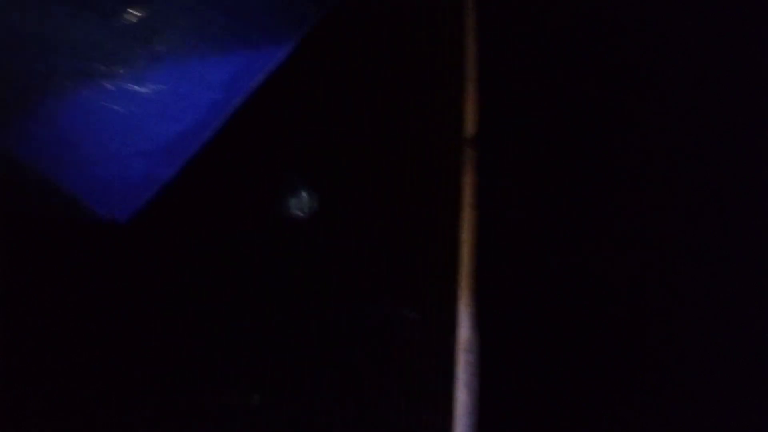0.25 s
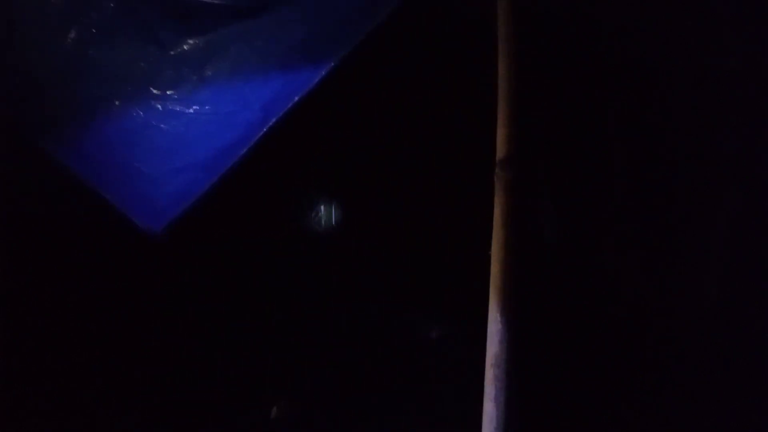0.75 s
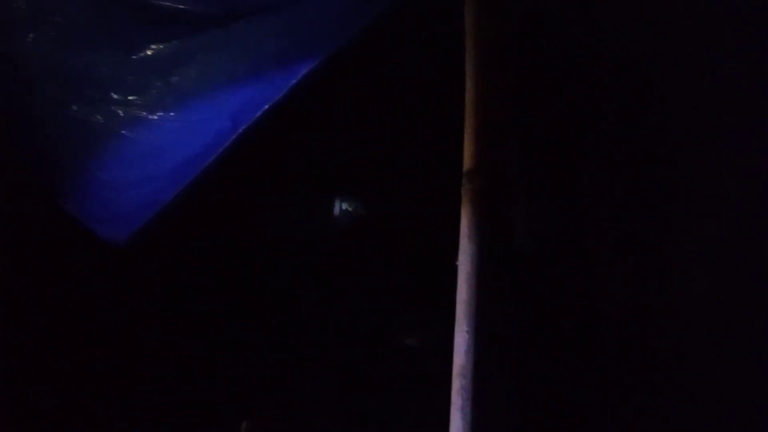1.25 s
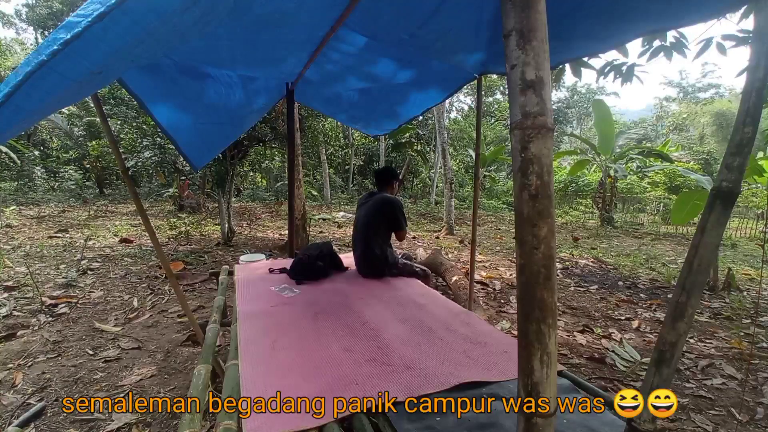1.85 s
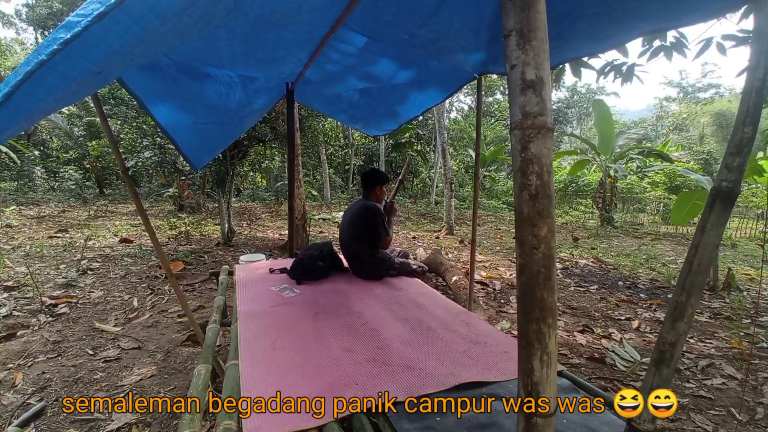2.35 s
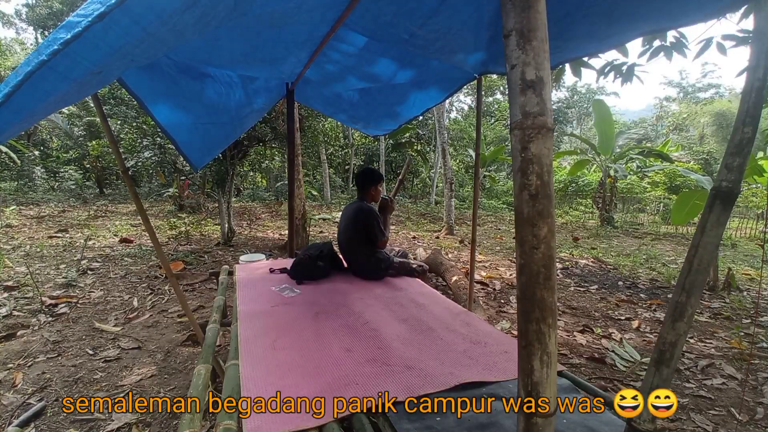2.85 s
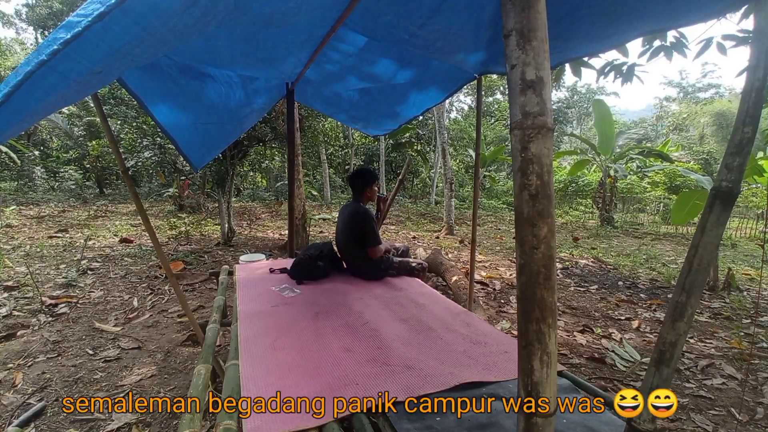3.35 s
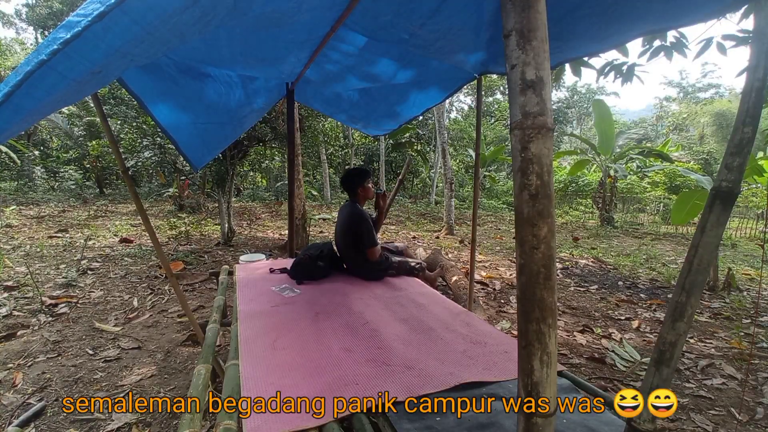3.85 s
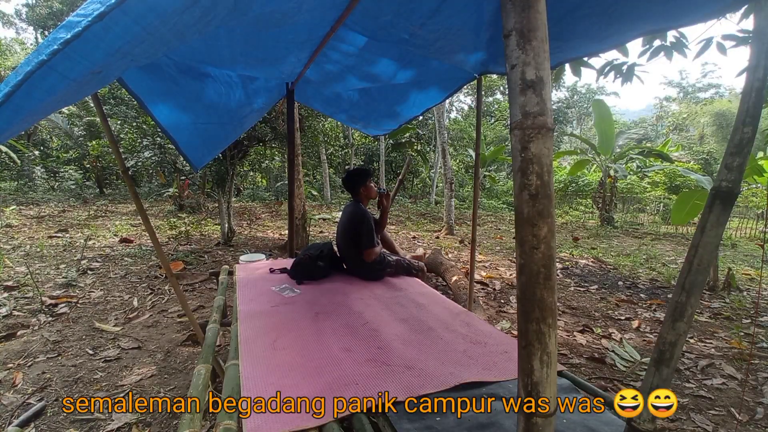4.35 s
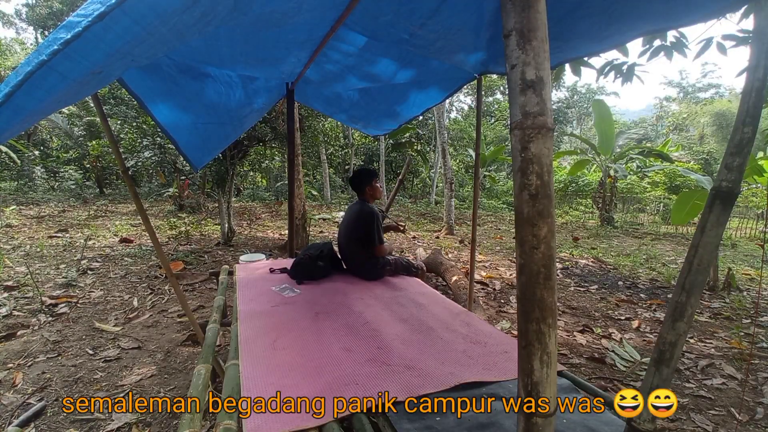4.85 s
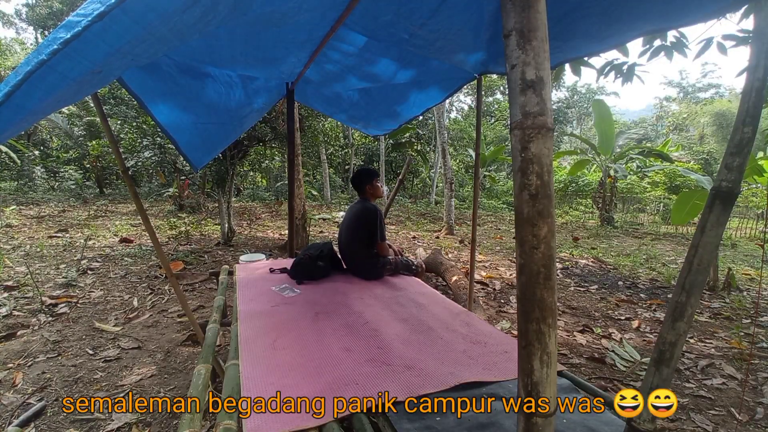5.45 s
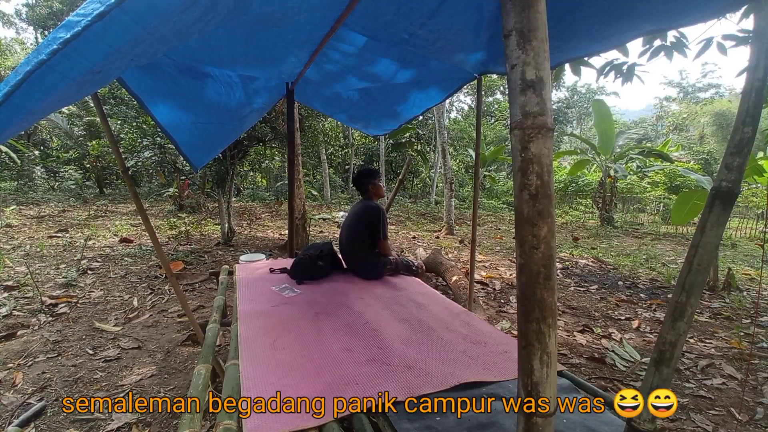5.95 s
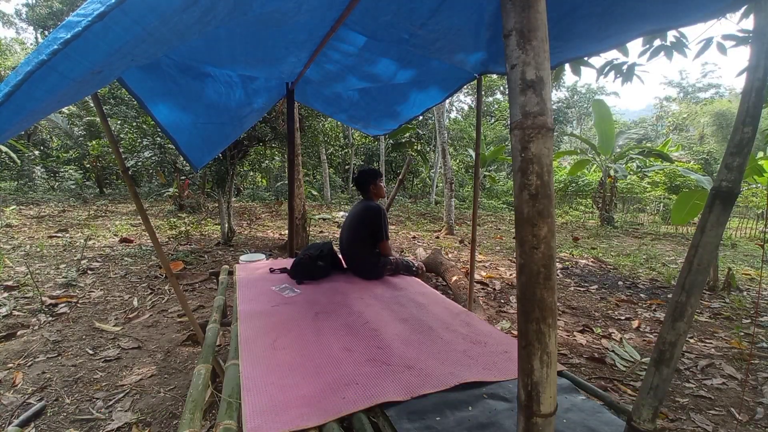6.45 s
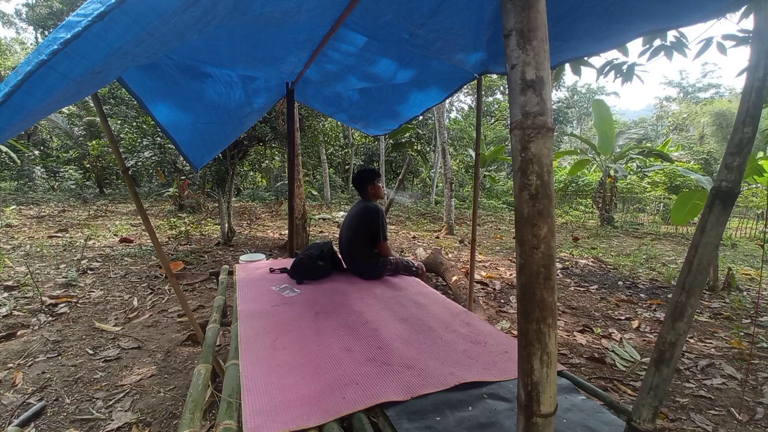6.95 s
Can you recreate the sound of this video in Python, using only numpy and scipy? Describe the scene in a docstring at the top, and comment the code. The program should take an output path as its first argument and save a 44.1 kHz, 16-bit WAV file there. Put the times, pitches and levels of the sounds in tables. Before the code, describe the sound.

Rain patters on a tarpaulin just above the microphone, with big drips slapping and plopping close by and a faint cricket behind. After about two seconds the sound cuts to a much quieter forest camp by day. Cicadas drone steadily and sometimes surge, birds whistle and chirp in the trees, a few soft clucks come nearby, and a distant fowl crows near the end. A low rumble runs underneath.

```python
"""Night rain patters on a tarpaulin over the microphone; big drips slap and ring the sheet close by,
and a cricket chirps. Near 1.9 s the scene cuts to the same camp by day: cicadas drone in the trees,
their clicks ringing through their bodies, and crickets stroke their wings. Birds whistle farther off,
something clucks nearby and distant fowl crow. A low rumble lies under both scenes."""
import sys
import numpy as np
from scipy import signal
from scipy.fft import rfft, irfft
from scipy.io import wavfile
from scipy.ndimage import uniform_filter1d

SR = 44100
rng = np.random.default_rng(int(sys.argv[2]) if len(sys.argv) > 2 else 0)


def dump(signal):
    """Clip the signal to [-1, 1] and save it as 16-bit WAV at the path in sys.argv[1]."""
    limited = np.clip(np.atleast_2d(signal).T, -1, 1)
    pcm = np.round(limited * 32767).astype(np.int16)
    wavfile.write(sys.argv[1], SR, pcm)


N = 317520
T = np.arange(N) / SR
CUT_S, FADE_S = 1.858, 0.1374  # middle and length of the day's fade-in


def undb(db):
    return 10 ** (np.asarray(db) / 20)


def unit(x):
    return x / np.sqrt(np.mean(x ** 2))


def shape(x, gain):
    """Filters x by gain(Hz)."""
    return irfft(rfft(x) * gain(np.maximum(np.fft.rfftfreq(len(x), 1 / SR), 1)), len(x))


def colour(x, points):
    """Filters x by a (Hz, dB) spectrum."""
    hz, db = np.transpose(points)
    return shape(x, lambda f: undb(np.interp(np.log(f), np.log(hz), db)))


def band(x, hz, width):
    """Keeps a bell-shaped band of x."""
    return shape(x, lambda f: np.exp(-((f - hz) / width) ** 2 * 2))


def walk(rate):
    """Random values, rate a second, joined by straight lines."""
    count = int(N / SR * rate) + 2
    return np.interp(T * rate, np.arange(count), rng.standard_normal(count))


def curve(table):
    """Sample span and interpolated columns of a table that leads with time."""
    s, *columns = np.transpose(table)
    span = slice(int(s[0] * SR), min(int(s[-1] * SR), N))
    return span, [np.interp(T[span], s, c) for c in columns]


def echo(x, t60, wet_db):
    """Adds a diffuse tail."""
    t = T[:int(t60 * SR)]
    tail = rng.standard_normal(len(t)) * 1000. ** (-t / t60)
    return x + undb(wet_db) * signal.fftconvolve(x, tail / np.sqrt(np.sum(tail ** 2)))[:N]


def flicker(points, slow_db, quick_db):
    """Noise in quarter-octave bands that swell slowly together and flicker quickly apart."""
    swell, out = walk(1.375), 0
    white = rfft(rng.standard_normal(N))
    octave = np.log2(np.maximum(np.fft.rfftfreq(N, 1 / SR), 1) / 30)
    for centre in np.arange(0, 9.5, .25):
        share = np.clip(1 - 4 * np.abs(octave - centre), 0, 1)
        out = out + irfft(white * share, N) * undb(slow_db * swell + quick_db * walk(9))
    return unit(colour(out, points))


# Tone of the rain from under the sheet: (frequency [Hz], gain [dB])
RAIN_SPECTRUM = [(150, -56), (250, -14.5), (400, -17), (560, -20.5), (771, -13.5), (1100, -7.5), (1450, -6),
                 (2200, -1), (3250, -7), (3930, -8), (5850, -14), (6720, -6), (9020, -30), (10500, -19.5),
                 (12500, -44), (15700, -37)]
# Swell of the shower: (time [s], level [dB])
RAIN_LEVELS = [(0, -46.5), (.25, -46.5), (.42, -44), (.62, -46), (1., -47), (1.3, -45.5), (1.68, -48),
               (1.9, -45)]


def rain(drops_per_cycle=.12, spread_db=4.2, out_s=1.92, fade_s=.06):
    """Overhead, uneven drops each ring their own patch of wet sheet; far rain hisses behind them."""
    near = 0
    for hz in 500 * 2 ** np.arange(0, 5, .5):
        hits = rng.random(N) < drops_per_cycle * hz / SR
        sizes = undb(spread_db * np.minimum(rng.exponential(size=N), 4))
        near = near + np.sqrt(hz) * unit(band(hits * sizes, hz, 0.4 * hz))
    near = unit(colour(echo(near, t60=0.046, wet_db=0.59), RAIN_SPECTRUM))
    far = flicker(RAIN_SPECTRUM, slow_db=0.25, quick_db=3.16)
    fade = np.clip((out_s - T) / fade_s + .5, 0, 1) ** 2
    return undb(np.interp(T, *np.transpose(RAIN_LEVELS))) * fade * (0.54 * near + 0.67 * far)


# Low end at the microphone: (frequency [Hz], gain [dB])
RUMBLE_SPECTRUM = [(25, -30), (71, -3), (139, 5), (204, -7.5), (281, -17.5), (339, -19), (377, -19.5),
                   (600, -23), (900, -70)]
# Its slow drift: (time [s], level [dB])
RUMBLE_LEVELS = [(0.0, -63.5), (0.94, -60.5), (1.6, -59), (2.2, -64.5), (3.5, -62.5), (4.5, -60.5),
                 (5.25, -65.5), (7.2, -58)]


def rumble(puff_db=2.8):
    """A low rumble that comes in puffs, night and day."""
    db = np.interp(T, *np.transpose(RUMBLE_LEVELS)) + puff_db * walk(8)
    return undb(db) * flicker(RUMBLE_SPECTRUM, slow_db=0.17, quick_db=3.9)


# Drops on sagging patches of sheet, close by: (time [s], level [dB], pitch [Hz])
SHEET_PLOPS = [(0.051, -41, 1080), (0.15, -47, 773), (0.193, -46, 961), (0.28, -30, 3300),
               (0.285, -38, 590), (0.2994, -38, 2070), (0.3785, -38, 1740), (0.432, -28, 2500),
               (0.475, -24, 3280), (0.4945, -20, 6600), (0.5394, -39, 1730), (0.8042, -8, 2350),
               (0.889, -31, 3700), (1.066, -32, 2250), (0.829, -45, 420), (1.082, -38, 800),
               (1.237, -35, 3100), (1.256, -37, 2900), (1.2965, -36, 1670), (1.3644, -31, 2460),
               (1.38, -31, 1750), (1.476, -37, 1940), (1.591, -45, 1090), (1.6207, -31, 4080),
               (1.637, -39, 1250), (1.639, -29, 2830), (1.789, -31, 2650), (1.846, -25, 2080)]


def plops(rise_cycles=1.5, spread=0.045, count=3):
    """Each hollow plop rings a few modes round the pitch of its patch; higher patches die sooner."""
    out, t = np.zeros(N), T[:4096]
    for s, db, hz in SHEET_PLOPS:
        modes = hz * (1 + spread * rng.standard_normal((count, 1)))
        ring = np.sum(np.sin(2 * np.pi * modes * t), axis=0) / count
        t60 = 28 / np.sqrt(hz * 550)
        envelope = 1000. ** (-t / t60) * np.minimum(t * hz / rise_cycles, 1)
        out[int(s * SR):int(s * SR) + len(t)] += undb(db) * ring * envelope
    return out


# Big drips beside the microphone: (time [s], body [dB], snap [dB], spray [dB], wash re crack [dB])
CLOSE_DRIPS = [(0.052, -42.5, -50, -62, -10), (0.279, -36.5, -36.5, -59, -8), (0.313, -41, -36.5, -50, -7),
               (0.432, -35, -43, -48, -21), (0.468, -40, -31.5, -59, -7), (0.494, -52, -31, -26.5, -15.5),
               (0.667, -44, -26, -44, -13.5), (0.717, -48, -34.5, -54, -9), (0.772, -50, -35, -52, -16),
               (0.8033, -17, -16.5, -34, -10), (0.888, -38, -38, -64, -9.5), (1.065, -45, -39, -64, -13.5),
               (1.083, -39.5, -54, -66.5, -3.5), (1.127, -44, -44, -47, -3), (1.138, -45, -42, -51.5, -11),
               (1.236, -47, -39, -57.5, -7.5), (1.312, -46, -35, -38.5, -7),
               (1.379, -36.5, -33.5, -49, -23), (1.404, -51.5, -42, -49, -7), (1.614, -41, -38, -55, -4.5),
               (1.638, -33.5, -30, -54, -13), (1.728, -41, -38, -55, -9), (1.741, -42, -32.5, -47, -17),
               (1.78, -44, -37.5, -54.5, -8.5), (1.815, -46, -36, -57, -23.5),
               (1.845, -32, -40, -56.5, -14.5)]
# Modes of the whole tarpaulin: (frequency [Hz], gain [dB], t60 [s])
SHEET_MODES = [(372, -6, .04), (607, -3, 0.04), (940, -6, 0.035), (1600, -5, 0.04)]


def drips(crack_t60=0.0067, wash_rise_s=0.0022, drying=0.77, mist_db=-11.5, ring_db=-8, heavy_db=-17):
    """Each drip: a crack, a ragged wash of splash that dies sooner in the treble, and the sheet's ring."""
    out, t = np.zeros(N + 8192), T[:8192]
    bands_hz = [(800, 3000), (3800, 7500), (7500, 11000), (11000, 15500)]  # body, snap, spray, mist
    filters = [signal.butter(4, edges, "bandpass", fs=SR, output="sos") for edges in bands_hz]
    mode_hz, mode_db, mode_t60 = np.transpose(SHEET_MODES)[:, :, None]
    ragged = undb(3.5 * walk(400))
    for s, body_db, snap_db, spray_db, wash_db in CLOSE_DRIPS:
        start = int((s + .001) * SR)  # each drip's crack starts 1 ms after its listed time
        span, splash = slice(start, start + len(t)), 0
        wash_t60 = 0.016 - .0031 * snap_db  # the softer the snap, the longer the wash
        for k, db in enumerate((body_db, snap_db, spray_db, spray_db + mist_db)):
            noise = unit(signal.sosfilt(filters[k], rng.standard_normal(len(t))))
            crack = noise / np.sqrt(np.mean(noise[:64] ** 2))
            crack *= np.minimum(t / .0007, 1) * 1000. ** (-t / crack_t60)
            wash = noise * ragged[span] * np.minimum(t / wash_rise_s, 1)
            wash *= 1000. ** (-t / max(wash_t60 * drying ** k, .01))
            splash = splash + undb(db) * (crack + undb(wash_db) * wash)
        blow_db = body_db + .4 * (body_db - heavy_db)  # only a heavy drip shakes the whole sheet
        # each drop lands elsewhere, so the modes share the blow anew
        share = rng.uniform(0.7, 1, mode_hz.shape) * rng.choice([-1, 1], mode_hz.shape)
        modes = undb(mode_db + blow_db) * np.sin(2 * np.pi * mode_hz * t) * 1000. ** (-t / mode_t60)
        out[span] += splash + undb(ring_db) * np.sum(share * modes, axis=0)
    return out[:N]


def call(table, rough, octave_db=None):
    """A sine and its octave along (time [s], pitch [Hz], level [dB], optional octave level [dB])."""
    span, (hz, db, *rest) = curve(table)
    waver = 1 + rough * (0.039 * walk(200) + .008 * walk(25))[span]
    phase = 2 * np.pi * np.cumsum(hz * waver) / SR
    upper_db = rest[0] if rest else db + octave_db
    out = np.zeros(N)
    out[span] = (undb(db) * np.sin(phase) + undb(upper_db) * np.sin(2 * phase)) * np.sqrt(2)
    out[span] *= signal.windows.tukey(len(hz), .3) * undb(6.4 * rough * np.tanh(walk(70)[span]))
    return out


# Chirps of one cricket near the shelter: (time [s])
NIGHT_CHIRP_TIMES = [.155, .235, .315, .99, 1.15, 1.24, 1.44, 1.525, 1.67]


def night_cricket(hz=6580, length_s=.035, db=-58):
    """Short, high chirps through the rain."""
    return sum(call([(s, hz, db), (s + length_s, hz, db)], rough=.2, octave_db=-60)
               for s in NIGHT_CHIRP_TIMES)


def partials(span, hz, multiples, gains, fade_db):
    """A click train as partials; each fades on its own as paths through the leaves interfere."""
    phase, out = 2 * np.pi * np.cumsum(hz) / SR, np.zeros(N)
    for k, gain in zip(multiples, gains):
        fading = undb(fade_db * (1.3 * np.tanh(walk(10)) + .5 * walk(35))[span])
        out[span] += gain * fading * np.sin(k * phase + 2 * np.pi * rng.random())
    return out


# Resonances of a cicada's body: (centre [click rates], width [click rates])
BODY_RESONANCES = [(10, .15), (20, .4), (23.5, 1.), (29, 2.), (40, .5), (42, 2.)]


def cicada(span, carrier_hz, body_db, waver=0.0003, fade_db=3.5, cycles_per_click=10):
    """Clicks ring through the resonances of the body."""
    multiples = np.arange(9, 46)
    gains = sum(undb(db) / (1 + (2 * (multiples - centre) / width) ** 2)
                for (centre, width), db in zip(BODY_RESONANCES, body_db))
    click_hz = carrier_hz / cycles_per_click * (1 + waver * walk(60)[span])
    return partials(span, click_hz, multiples, gains, fade_db)


# Steady cicadas: (top [Hz], bottom [Hz], breath [s], time of one top [s], falling share [0-1])
DRONE_SINGERS = [(3259, 3220, 1.125, 2.88, .62), (3333, 3289, .885, 2.38, .58),
                 (3245, 3202, 1.5, 2.07, .65)]
# Their bodies, one row a singer: (level of each of the six resonances [dB])
DRONE_BODIES = [
    [-59, -69.5, -73, -84, -58, -74],
    [-60.5, -69.5, -83, -84, -60.5, -82],
    [-62.5, -66, -78, -75, -60, -73],
]
# Their shared swell and ebb: (time [s], gain [dB])
DRONE_SWELL = [(1.8, 1), (2.5, 2.5), (2.83, -4), (3.2, 1.5), (5.4, 1.5), (5.74, -4), (6.05, 2), (7.2, -1.5)]


def droning_cicadas():
    """Cicadas in the near trees; each one's carrier sags and recovers once a breath."""
    span, out = slice(int((CUT_S - FADE_S) * SR), N), 0
    for (top_hz, bottom_hz, breath_s, top_s, falling), body_db in zip(DRONE_SINGERS, DRONE_BODIES):
        breath = (T[span] - top_s) / breath_s % 1
        hz = np.interp(breath, [0, falling, 1], [top_hz, bottom_hz, top_hz])
        out = out + cicada(span, uniform_filter1d(hz, int(.08 * SR)), body_db)
    return undb(np.interp(T, *np.transpose(DRONE_SWELL))) * out


# Insects deep in the forest: (centre [Hz], width [Hz], level [dB])
CHORUS_BANDS = [(3279, 165, -66.5), (3540, 283, -78.5), (4280, 410, -76), (6584, 504, -63.5),
                (7690, 568, -71.5), (9820, 670, -74.5), (12900, 483, -64.5)]


def chorus(hz, width, db, count=10, tonal=0.9, fade_db=9.):
    """Many far singers: thin wavering tones that come and go over their common hiss."""
    tones = 0
    for singer_hz in hz + width * rng.uniform(-.5, .5, count):
        fading = undb(fade_db * np.tanh(walk(5.5)))
        pitch = singer_hz * (1 + .006 * walk(4) + 0.002 * walk(80))
        tones = tones + fading * np.sin(2 * np.pi * np.cumsum(pitch) / SR)
    hiss = undb(2.0 * walk(4.02) + 1.25 * walk(13)) * unit(band(rng.standard_normal(N), hz, width))
    return undb(db) * (tonal * unit(tones) + hiss)


# Tone of the foliage round the camp: (frequency [Hz], gain [dB])
LEAF_SPECTRUM = [(200, -11), (300, -5.5), (600, -7.5), (1200, -12.5), (2000, -16), (2900, -15.5),
                 (5200, -20.5), (8700, -16), (11300, -21.5), (14500, -7.5), (15700, -15.5)]
# Its rise and fall: (time [s], level [dB])
LEAF_LEVELS = [(1.8, -65.5), (4.1, -65.5), (4.9, -68.5), (6, -66), (7.2, -68)]


def leaf_hiss():
    """The soft, flickering hiss of leaves."""
    level = undb(np.interp(T, *np.transpose(LEAF_LEVELS)))
    return level * flicker(LEAF_SPECTRUM, slow_db=1.5, quick_db=2.3)


def day_crickets(stroke_hz=55, ring_hz=4250, width_hz=470, db=-70, stop_s=5.66, dying_db_per_s=28):
    """Nearby, even wing strokes ring in one band; they swell and ebb, and die away near the end."""
    span, multiples = slice(int(CUT_S * SR), N), np.arange(66, 84)
    gains = np.exp(-2 * ((multiples * stroke_hz - ring_hz) / width_hz) ** 2)
    rate_hz = stroke_hz * (1 + 0.00302 * walk(5)[span])
    song = unit(partials(span, rate_hz, multiples, gains, fade_db=7.8))
    return song * undb(db + 2.5 * walk(5.4) - dying_db_per_s * np.maximum(T - stop_s, 0))


# Birds among the trees: (time [s], length [s], start [Hz], end [Hz], level [dB], roughness [0-1])
BIRD_CHIRPS = [(1.995, 0.036, 4250, 3680, -66, .2), (2.66, .1, 4400, 4070, -65.5, 0.26),
               (2.97, .3, 3750, 3620, -67, .3), (3.33, 0.19, 1169, 1157, -72, 0.46),
               (3.75, 0.082, 1190, 1170, -70, 0.27), (3.757, 0.2, 352.3, 345, -72, 0.66),
               (3.845, 0.045, 2950, 2650, -67, 0.26), (4.679, 0.087, 4520, 4170, -66, 0.45),
               (4.76, .12, 4200, 4210, -69, 0.1), (5.833, 0.094, 4380, 4360, -69, 0.07),
               (5.85, 0.061, 3840, 3810, -67, 0.37), (5.927, 0.043, 3140, 2777, -64.5, 0.02),
               (5.943, 0.082, 4220, 4200, -67, 0.05), (6.017, 0.041, 4300, 3770, -66, 0.3),
               (6.032, 0.164, 346.7, 350, -73, 0.8), (6.148, 0.069, 3820, 3910, -69, .3),
               (6.192, 0.033, 2230, 2210, -71, 0.7), (6.194, 0.026, 2790, 2706, -72, 0.65),
               (6.25, 0.19, 3600, 3580, -69, 0.13), (6.412, 0.0396, 4490, 4561, -69, 0.2),
               (6.633, 0.093, 4200, 3850, -71, 0.2), (6.898, 0.071, 4453, 4370, -70, 0.05),
               (6.989, 0.076, 4300, 3730, -70.5, 0), (7.061, .17, 768, 768, -62.5, 0.24)]


def chirps():
    """Brief chirps and hoots, each a straight glide."""
    return sum(call([(s, start_hz, db), (s + length, end_hz, db)], rough, octave_db=-26)
               for s, length, start_hz, end_hz, db, rough in BIRD_CHIRPS)


# Stirs on the ground: (middle time [s], length [s], level [dB], knock pitch [Hz])
GROUND_RUSTLES = [(2.225, .05, -72, 830), (2.47, 0.059, -67, 600), (2.77, 0.072, -72.5, 1800),
                  (3.49, .04, -71, 450), (3.995, 0.08, -65, 450), (4.252, .05, -71, 600),
                  (4.525, .04, -71, 600), (4.633, 0.11, -69, 1200), (5.06, 0.045, -67, 500)]


def rustles(leaf_gain=.6, knock_width=.6):
    """Short crackly stirs of leaf litter, each with a dull knock of its own pitch."""
    out, grain = np.zeros(N), undb(3.5 * walk(90))
    leaves = unit(band(rng.standard_normal(N), hz=640, width=2200))
    for s, length, db, hz in GROUND_RUSTLES:
        span = slice(int((s - length) * SR), int((s + length) * SR))
        knock = unit(band(rng.standard_normal(N)[span], hz, knock_width * hz))
        envelope = np.exp(-2 * ((T[span] - s) / (length / 2)) ** 2)
        out[span] += undb(db) * envelope * grain[span] * (knock + leaf_gain * leaves[span])
    return out


# Path of one whistle from the trees: (time [s], pitch [Hz], level [dB])
WHISTLE_PATH = [(2.214, 5700, -52), (2.238, 6050, -56), (2.247, 5750, -49), (2.263, 4350, -52),
                (2.269, 4000, -68), (2.279, 3900, -51), (2.292, 3650, -60), (2.35, 3430, -52)]


def falling_whistle():
    """A bird's slightly hoarse whistle rises, slides down and breaks in steps."""
    return call(WHISTLE_PATH, rough=0.3, octave_db=-60)


# Raspy buzzes round the camp:
# (time [s], length [s], start [Hz], end [Hz], level [dB], attack [s], release [s], width [Hz])
BUZZ_SWEEPS = [(3.83, .14, 4550, 4130, -57.5, 0.028, .05, 550),
               (2.7, .66, 9250, 10350, -67.5, .06, .06, 800),
               (4.55, .17, 8600, 10450, -56, 0.12, 0.023, 800)]


def buzz(s, length, start_hz, end_hz, db, attack_s, release_s, width_hz, throb_hz=16., edge_db=-19):
    """A throbbing band of noise that swells as its centre slides."""
    span, (hz,) = curve([(s, start_hz), (s + length, end_hz)])
    db = db + edge_db * np.interp(T[span] - s, [0, attack_s, length - release_s, length], [1, 0, 0, 1])
    rasp = unit(band(rng.standard_normal(len(hz)), 0, width_hz))
    throb = 1 + 0.48 * np.sin(2 * np.pi * throb_hz * T[span])
    out = np.zeros(N)
    out[span] = undb(db) * throb * rasp * np.sin(2 * np.pi * np.cumsum(hz) / SR)
    return out


# One near cicada that surges now and then: (time [s], length [s], top carrier [Hz], level [dB])
CICADA_SURGES = [(2.9, 0.56, 3463, -53.5), (4.2, 0.49, 3404, -59), (5.8, .7, 3555, -61)]
# Its body: (gain of each of the six resonances [dB])
SURGE_BODY = [-0.5, -9, -24, -19.5, -0.5, -12]


def surging_cicada(s, length, top_hz, db, rasp=0.62, attack_share=0.2304, release_share=0.21, edge_db=-15):
    """It climbs to its top pitch as it swells, then sags; its clicks are uneven, so it rasps."""
    top_s, end_s = s + attack_share * length, s + length
    span, (hz,) = curve([(s, 0.97 * top_hz), (top_s, top_hz), (end_s, 0.95 * top_hz)])
    db = db + edge_db * np.interp(T[span], [s, top_s, end_s - release_share * length, end_s], [1, 0, 0, 1])
    out = cicada(span, hz, SURGE_BODY, waver=.005, fade_db=2.0)
    out *= 1 + rasp * walk(350)
    out[span] *= undb(db)
    return out


# Clucks and knocks near the microphone: (time [s], level [dB], pitch [Hz])
NEAR_CLUCKS = [(3.215, -56, 795), (3.285, -52, 790), (3.375, -57, 808), (3.479, -61, 860),
               (3.599, -64, 757), (3.979, -58, 854), (6.86, -56, 1080)]


def clucks(t60=0.072, rise_s=.008, upper_ratio=1.8, upper_db=-3):
    """Short hollow notes, each ringing at two pitches."""
    out, t = np.zeros(N), T[:4096]
    envelope = 1000. ** (-t / t60) * np.minimum(t / rise_s, 1)
    for s, db, hz in NEAR_CLUCKS:
        tone = np.sin(2 * np.pi * hz * t) + undb(upper_db) * np.sin(2 * np.pi * upper_ratio * hz * t)
        out[int(s * SR):int(s * SR) + len(t)] += undb(db) * tone * envelope
    return out


# A faint bird off in the trees: (time [s])
PEEP_TIMES = [3.36, 4.925, 5.46, 6.082]


def peeps(hz=4980, length_s=.05, db=-75):
    """High, rough peeps on one pitch."""
    return sum(call([(s, hz, db), (s + length_s, hz, db)], rough=.5, octave_db=-26) for s in PEEP_TIMES)


def arch(s, length, hz, db, octave_db, peak_share, edge_pitch, in_db, out_db, rough):
    """A note whose level and pitch rise to a peak and fall away."""
    return call([(s, edge_pitch * hz, db + in_db, octave_db + in_db),
                 (s + peak_share * length, hz, db, octave_db),
                 (s + length, edge_pitch * hz, db + out_db, octave_db + out_db)], rough)


# Piping from the trees: (time [s], length [s], top pitch [Hz], level [dB], octave level [dB])
PIPED_NOTES = [(3.871, 0.047, 2760, -57.5, -73), (3.918, .055, 2886, -57, -59),
               (6.389, 0.048, 2266, -57, -76), (6.45, 0.054, 2370, -63.5, -88)]


def piping_bird():
    """Pairs of piped notes that swell and die away."""
    return sum(arch(*note, peak_share=0.42, edge_pitch=0.98, in_db=-10, out_db=-14, rough=0.27)
               for note in PIPED_NOTES)


# Fowl far from the camp: (time [s], length [s], top pitch [Hz], level [dB], octave level [dB])
CROW_SYLLABLES = [(5.741, 0.23, 771, -70.5, -72.5), (6.03, 0.173, 850, -63, -69),
                  (6.242, 0.093, 740, -63.5, -82), (6.329, 0.36, 857.5, -63, -66.5)]


def crowing_fowl():
    """A hoarse crow in four arched syllables."""
    return sum(arch(*syllable, peak_share=0.397, edge_pitch=.96, in_db=-7, out_db=-14, rough=0.88)
               for syllable in CROW_SYLLABLES)


def forest():
    """The camp by day: near singers carry a short echo, the farther birds a longer, stronger one."""
    near = droning_cicadas() + sum(surging_cicada(*row) for row in CICADA_SURGES) + day_crickets()
    far = sum(chorus(*row) for row in CHORUS_BANDS)
    birds = falling_whistle() + piping_bird() + chirps() + peeps() + crowing_fowl()
    air = leaf_hiss() + sum(buzz(*row) for row in BUZZ_SWEEPS) + rustles()
    return echo(near + clucks(), t60=0.223, wet_db=-12.5) + echo(birds, t60=0.62, wet_db=-2.6) + far + air


def scene():
    """One microphone in camp: the rainy night gives way to day over an unbroken rumble."""
    low, cricket = rumble(), night_cricket()
    night = rain() + echo(drips() + plops() + cricket, t60=0.17, wet_db=-9.0)
    day_fade = np.clip((T - CUT_S) / FADE_S + .5, 0, 1)
    return (night + day_fade * forest() + low)[None]


def record(dry):
    """The recorder cuts the top above 15.65 kHz."""
    return signal.sosfilt(signal.ellip(10, .2, 60, 15650, fs=SR, output="sos"), dry)


dry = scene()
out = record(dry)
dump(out)
```